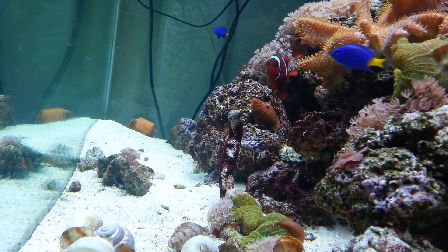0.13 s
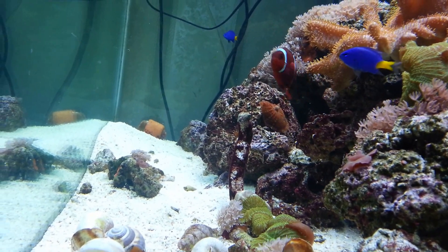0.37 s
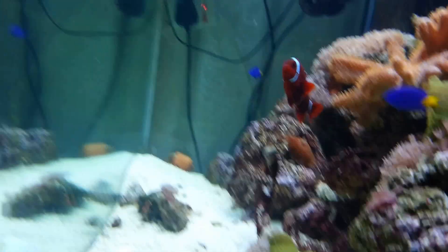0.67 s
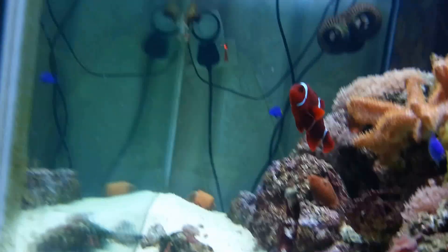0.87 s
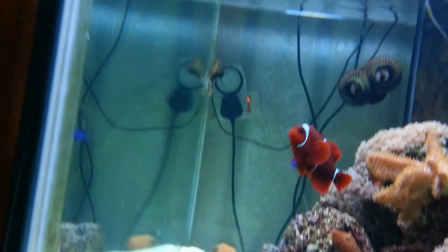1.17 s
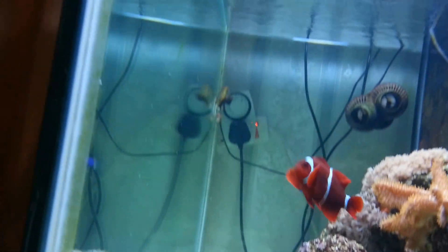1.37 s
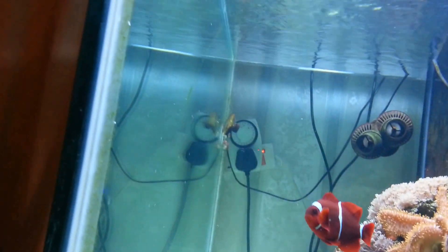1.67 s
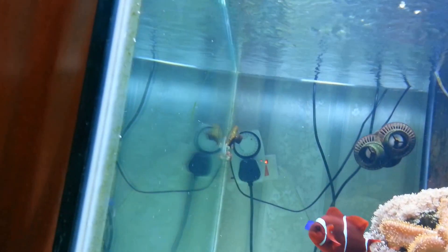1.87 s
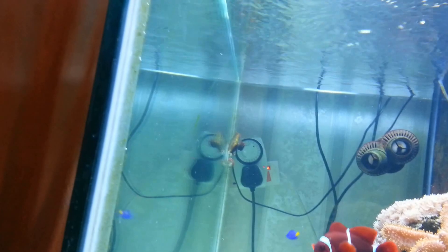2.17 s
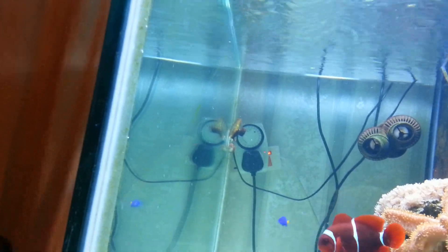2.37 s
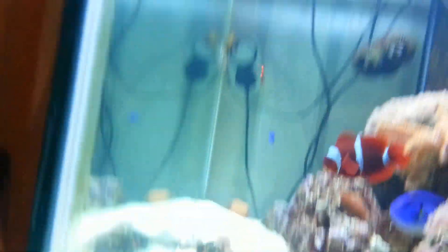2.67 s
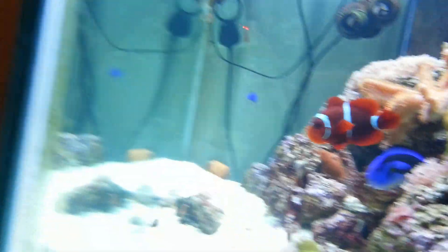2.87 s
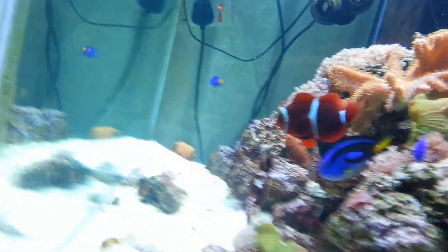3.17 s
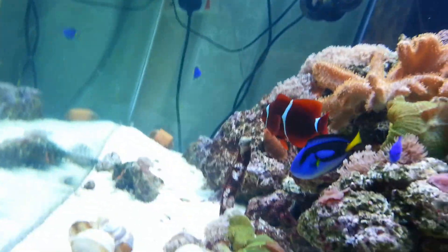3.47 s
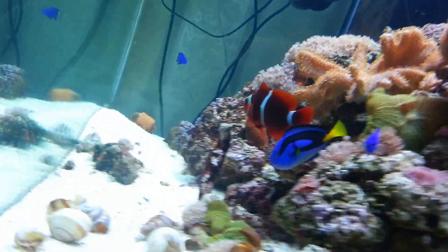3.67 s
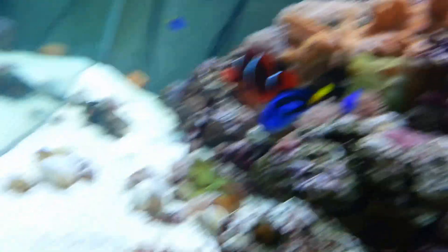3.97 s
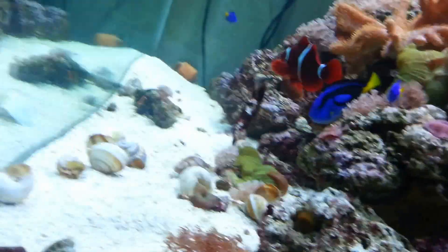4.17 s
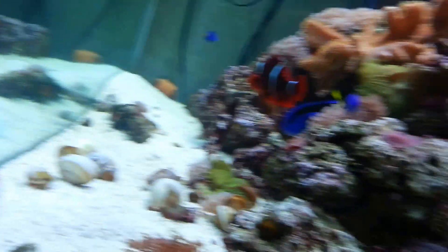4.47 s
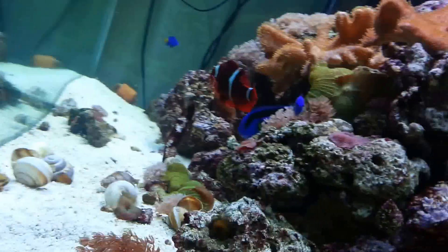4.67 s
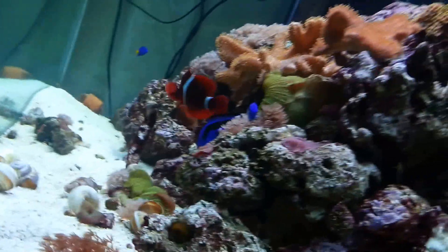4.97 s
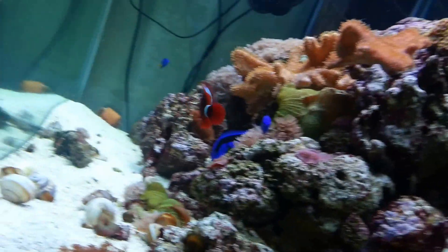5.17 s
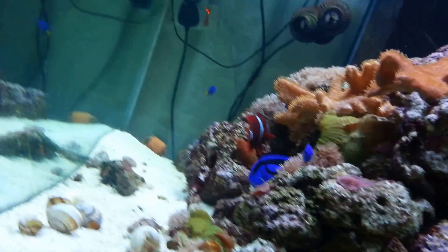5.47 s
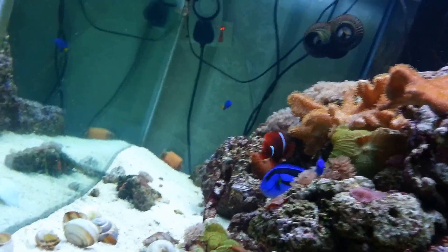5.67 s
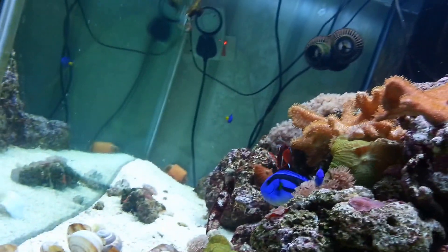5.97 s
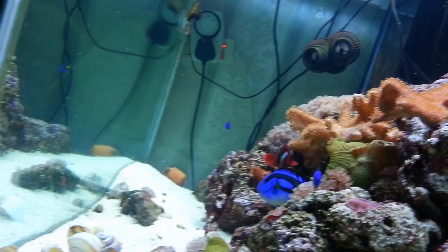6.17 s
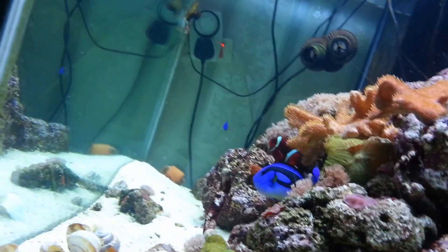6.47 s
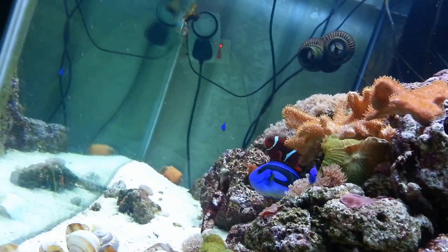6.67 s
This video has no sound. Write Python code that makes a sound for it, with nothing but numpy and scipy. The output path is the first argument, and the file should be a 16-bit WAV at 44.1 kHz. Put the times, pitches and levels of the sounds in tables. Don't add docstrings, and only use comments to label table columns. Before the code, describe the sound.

Steady low electrical hum and gentle surging water noise fill the whole scene. At first there is only a sharp tick and small scratchy rubs, then a violent crack of the camera casing, then a cluster of knocks and low thumps as a finger shifts over the right microphone. A thin whine joins midway, and a few tiny drips close it. Handheld, indoors, slight hiss.

```python
import sys
import numpy as np
from scipy import signal
from scipy.fft import rfft, irfft
from scipy.io import wavfile
from scipy.ndimage import uniform_filter1d

SR = 44100
rng = np.random.default_rng(int(sys.argv[2]) if len(sys.argv) > 2 else 0)


def persist_wave(psi):
    counts = np.round(np.clip(psi, -1, 1) * 32767).astype(np.int16)
    wavfile.write(sys.argv[1], SR, np.atleast_2d(counts).T)


def voltage_ratio(level):
    return 10 ** (np.asarray(level, float) / 20)


N = 300762
MAINS_HZ = 49.96


def at_hz(points, hz, column=1):
    points = np.array(points)
    return np.interp(np.log(hz + 1), np.log(points[:, 0]), points[:, column])


def drift(rate):
    r = np.exp(-80 * np.pi * rate / SR)
    slow = signal.lfilter([1], [1, -2 * r, r * r], rng.standard_normal(N // 40 + 2002))
    slow = slow[2000:]
    return np.interp(np.arange(N) / 40, np.arange(len(slow)), slow / slow.std())


def coloured(db_per_hz, turn=0):
    return voltage_ratio(db_per_hz) * np.sqrt(SR / 2) * np.exp(-1j * turn)


def band_pass(order, edges_hz, sound):
    return signal.sosfilt(signal.butter(order, edges_hz, "band", fs=SR, output="sos"), sound)


def add(track, s, sound):
    i = round(s * SR)
    track[i:i + len(sound)] += sound[:N - i]


def ring(hz, t60, rise=0.):
    t = np.arange(int(t60 * SR)) / SR
    return np.sin(2 * np.pi * hz * t) * voltage_ratio(-60 * t / t60) * (1 - np.exp(-t / (rise + 1e-6)))


def port_lag(hz):
    return 0.29 + 1.33 * np.tanh(hz / 400)


def hum(loss):
    # (multiple of mains, left level [dB], right minus left [dB], wobble [dB])
    orders = [(1, -58.5, 3.5, -4.2), (2, -44.5, -5, .5), (3, -50.5, -2.5, 2.5), (4, -65.5, -14, -4),
              (5, -67, -1.5, 4), (6, -57.5, -11.5, 2), (7, -72.5, -18, -0.5), (8, -76.5, -5, 4.5),
              (9, -63, -21, 6), (10, -67.5, -1, 7), (12, -64.5, -19, 1.5), (14, -62.5, -11.5, 2.5),
              (16, -73, -8, 9)]
    # (time [s], whine level [dB], 14th overtone gain [dB])
    turning = [
        (0, -96, -1.5),
        (2.6, -90, -.5),
        (3, -76, .1),
        (4.5, -75, 1.5),
        (6.82, -76, 1.8),
    ]
    t, out = np.arange(N) / SR, np.zeros((2, N))
    s, whine_db, turn_db = np.transpose(turning)
    for order, db, right_db, wobble_db in orders:
        phase = order * (2 * np.pi * MAINS_HZ * t - np.pi / 2)
        phase = phase - 0.3 * (order - 1) ** 2 + 0.14 * wobble_db * drift(3.5)
        level_db = db + wobble_db * np.tanh(drift(3.45))
        if order == 14:
            level_db = level_db + np.interp(t, s, turn_db)
        height = np.sqrt(2) * voltage_ratio(level_db)
        muffled = voltage_ratio(right_db) * loss ** (1.25 + 0.18 * order)
        out[0] += height * np.cos(phase)
        out[1] += height * muffled * np.cos(phase - port_lag(order * MAINS_HZ))
    whine_height = voltage_ratio(np.interp(t, s, whine_db) + 6 + 2.5 * drift(5))
    whine = whine_height * np.sin(2 * np.pi * 1120 * t + 0.8 * drift(5))
    return out + whine * voltage_ratio([[0], [-18]])


def rush(loss):
    # (pitch [Hz], level [dB per Hz])
    spectrum = [(30, -99), (42, -86), (70, -76.5), (125, -75.5), (230, -73), (290, -78.5), (480, -78.5),
                (680, -85), (870, -87), (1120, -93), (1600, -97.5), (3000, -106), (5000, -114),
                (9000, -120)]
    # (pitch [Hz], gain [dB], share common with the open port [0-1])
    muffle = [(60.3, 3, 0.7), (201, -6.5, 0.97), (306, -6.5, 0.86), (700, -15, 0.1), (1383, -10.5, .05),
              (5000, -8.5, 0)]
    # (pitch [Hz], width [Hz], gain [dB])
    cabinet = [
        (231.2, 7, 6.5),
        (489, 87, 1),
        (700, 30, -1.5),
        (810, 40, -0.5),
    ]
    hz, t = np.arange(N // 2 + 1) * SR / N, np.arange(N) / SR
    surge_db = 0.59 * drift(11) + 0.19 - 0.08 * t
    near, own = rfft(rng.standard_normal((2, N)) * voltage_ratio(surge_db))
    db = at_hz(spectrum, hz)
    for top_hz, width, top_db in cabinet:
        db = db + top_db / (1 + (2 * (hz - top_hz) / width) ** 2)
    share = np.clip(at_hz(muffle, hz, column=2), 0, 1)
    right = share * near + np.sqrt(1 - share ** 2) * own
    right = right * coloured(db + at_hz(muffle, hz), port_lag(hz))
    return irfft([near * coloured(db), right], N) * [np.ones(N), loss]


def thump(first_hz, last_hz, peak_ms):
    t = np.arange(int(0.08 * SR)) / SR
    sag, smother = 0.005, 1.6
    phase = 2 * np.pi * (last_hz * t + (first_hz - last_hz) * sag * (1 - np.exp(-t / sag)))
    u = t / peak_ms * 1000
    return -np.sin(phase) * u * np.exp((1 - u ** smother) / smother)


def finger(rumble_db):
    # (time [s], peak [dB], first pitch [Hz], last pitch [Hz], time to peak [ms])
    thumps = [(0.8416, -31.2, 109, 89, 8.7), (3.2387, -28.2, 171, 101, 3.5), (3.351, -28.1, 197, 61, 8.9),
              (3.6006, -15.5, 265, 91, 6.0), (3.7148, -14.8, 248, 96, 5.2), (4.1056, -14.4, 148, 92, 6.6),
              (4.3571, -20.4, 258, 75, 6.4), (4.5866, -33.1, 202, 96, 6.3), (4.877, -25.3, 217, 64, 8.1),
              (4.9106, -30.5, 102, 82, 7.7), (5.1317, -10.2, 291, 63, 6.1), (5.4153, -35, 172, 56, 13.6),
              (5.5092, -31.6, 288, 61, 16.0), (5.5547, -15.3, 252, 70, 9.5), (5.6021, -17.2, 234, 76, 9.9)]
    # (time [s], blow [dB], pitch [Hz])
    catches = [
        (3.5146, -32, 520),
        (3.6021, -12, 450),
        (4.104, -14, 250),
        (4.104, -23, 480),
        (4.3582, -22, 350),
        (5.7632, -34, 400),
    ]
    lumps = band_pass(3, [37, 150], rng.standard_normal(N) * voltage_ratio(2.0 * drift(15)))
    out = voltage_ratio(rumble_db) * lumps / lumps.std()
    for s, db, first_hz, last_hz, peak_ms in thumps:
        add(out, s, voltage_ratio(db) * thump(first_hz, last_hz, peak_ms))
        if first_hz > 200:
            edge_db = db + 2.5 - 1.18 * peak_ms
            edge = ring(1.5 * first_hz, 0.012, rise=0.0006)
            add(out, s + 0.269 * peak_ms * 0.0011, voltage_ratio(edge_db) * edge)
    for s, db, hz in catches:
        add(out, s, voltage_ratio(db) * ring(hz, 0.009, rise=0.0005))
    return band_pass(2, [24, 950], out)


def noise_swells():
    # (time [s], length [s], level [dB])
    dull_swells = [(0.34, 0.071, -73), (0.95, .045, -62), (2.338, .06, -68), (2.63, 0.053, -61.5),
                   (3.249, 0.061, -54), (3.31, 0.1, -62), (3.499, 0.066, -63.5), (3.591, 0.042, -59),
                   (3.696, 0.078, -63.5), (4.078, 0.098, -57), (4.151, 0.14, -64), (4.339, 0.068, -58.5),
                   (4.608, 0.025, -63), (4.833, 0.21, -68.5), (5.529, 0.074, -60), (5.583, 0.067, -63)]
    # (time [s], length [s], level [dB])
    bright_swells = [
        (0.948, 0.047, -59.5),
        (3.587, .06, -68),
        (4.757, 0.36, -75),
        (5.125, 0.053, -64),
    ]
    out = np.zeros(N)
    for bursts, hz in [(dull_swells, 2580), (bright_swells, 9400)]:
        for s, length, db in bursts:
            roughness = np.repeat(voltage_ratio(rng.normal(0, 2.1, 128)), 128)
            noise = band_pass(1, [hz / 1.94, hz * 1.05], rng.standard_normal(16384) * roughness)
            noise = noise[:int(length * SR)]
            swell = np.interp(np.linspace(0, 1, len(noise)), [0, 0.21, 1.2], [0, 1.3, 0])
            add(out, s, voltage_ratio(db) * noise / noise.std() * swell)
    return out


def ticks():
    # (time [s], peak [dB], casing pitch [Hz], port whistle minus peak [dB])
    hard = [
        (0.9275, -46, 3000, 6),
        (0.9507, -45, 3000, 13),
        (0.9586, -5.5, 1050, -8.5),
        (3.2585, -33, 2980, -12),
        (3.2742, -10, 1150, -6),
    ]
    # (time [s], peak [dB])
    creaks = [(.976, -38), (1.465, -42), (1.587, -44), (2.409, -36.5), (2.6395, -39), (2.66, -45),
              (4.358, -33)]
    # (time [s], peak [dB])
    taps = [
        (3.5145, -29),
        (4.3575, -25.5),
        (5.556, -29),
        (5.602, -34),
    ]
    out = np.zeros(N)
    faint = [(*row, 2380, -13) for row in creaks] + [(*row, 477, -25) for row in taps]
    for s, db, hz, port_db in [*hard, *faint]:
        add(out, s, -voltage_ratio(db + 4) * ring(hz, 2.9 / hz, rise=0.0001))
        add(out, s, voltage_ratio(db + port_db + 3.5) * ring(7500, 0.0024, rise=0.00015))
        add(out, s, voltage_ratio(db + port_db - 9) * ring(10900, 0.0012, rise=0.0001))
    out = signal.lfilter(*signal.iirnotch(5800, 5, fs=SR), out + 1e-18)
    return signal.sosfilt(signal.butter(2, 230, "high", fs=SR, output="sos"), out)


def drops():
    # (time [s], level [dB], pitch [Hz], length [s])
    plinks = [(2.328, -57.5, 1380, 0.035), (2.943, -72, 2900, 0.059), (3.513, -68, 5200, .006),
              (6.342, -76, 1880, 0.053), (6.396, -70, 2610, 0.022), (6.41, -70, 2050, 0.022),
              (6.462, -70, 1596, .03), (6.485, -73, 1560, .04), (6.515, -66, 1620, .04)]
    out = np.zeros(N)
    for s, db, first_hz, length in plinks:
        hz = np.linspace(first_hz, first_hz * 1.02, int(length * SR))
        waver = uniform_filter1d(rng.standard_normal(4096), size=64)[:len(hz)]
        hz = hz * (1 + 0.21 * waver)
        add(out, s, voltage_ratio(db + 9) * np.sin(2 * np.pi * np.cumsum(hz) / SR) * np.hanning(len(hz)))
    return out


def casing():
    # (time [s], push [dB], +1 inward or -1 outward, contact [ms])
    snap = [
        (3.2993, -10, 1, 1.8),
        (3.3007, 4, -1, .7),
        (3.3015, -5, -1, .6),
        (3.302, -9, 1, 2.6),
        (3.3045, -6, -1, .6),
    ]
    # (pitch [Hz], level [dB], time to die by 60 dB [s])
    modes = [(179, -16, 0.036), (800, -18, 0.025), (1158, -11, 0.015), (1560, -5, 0.0037),
             (2090, -14.5, 0.02), (2740, -18.5, 0.018), (3730, -16, 0.013), (3970, -16, .013),
             (4400, -21.5, 0.014), (5395, -22, 0.02), (7100, -41, .012), (11500, -42, 0.0065)]
    out = np.zeros(N)
    for s, db, side, contact_ms in snap:
        add(out, s, np.sign(side) * voltage_ratio(db) * np.hanning(int(contact_ms * SR / 1000)))
        strengths = rng.normal(0, 1.5, len(modes))
        for (hz, mode_db, t60), chance_db in zip(modes, strengths):
            blow = np.sign(side) * voltage_ratio(db + mode_db + chance_db)
            add(out, s, blow * ring(hz, t60, rise=0.0011))
    t = np.arange(int(0.03 * SR)) / SR
    rattle = band_pass(2, [300, 5500], rng.standard_normal(len(t)))
    add(out, snap[-2][0], voltage_ratio(-11.5 - 60 * t / 0.023) * rattle * np.minimum(t / 0.0021, 1))
    t = np.arange(SR // 4) / SR
    glow = band_pass(2, [7600, 10200], rng.standard_normal(len(t)))
    add(out, snap[-1][0], voltage_ratio(-61 - 60 * t / 0.6) * glow / glow.std())
    return signal.sosfilt(signal.butter(2, 110, "high", fs=SR, output="sos"), out)


def scene():
    # (time [s], extra gain [dB], rumble level [dB])
    grip = [(0, 1, -65), (.9, 1, -64), (1.3, -0.5, -66), (2.4, -1, -59), (2.6, -1, -52), (3, 0, -65),
            (3.5, 1.7, -53), (4.2, -2, -45.5), (4.7, -3.5, -47.5), (5.0, -2, -39.5), (5.2, -3, -56),
            (5.45, -4, -45.5), (5.9, -4.5, -49), (6.82, -5.5, -52)]
    s, loss_db, rumble_db = np.transpose(grip)
    t = np.arange(N) / SR
    loss = voltage_ratio(np.interp(t, s, loss_db))
    room = hum(loss) + rush(loss)
    hand = finger(np.interp(t, s, rumble_db)) * voltage_ratio([[-28], [0]])
    small = (noise_swells() + drops()) * voltage_ratio([[0], [-13]]) + ticks() * voltage_ratio([[0], [-36]])
    shell = casing()
    leak = signal.sosfilt(signal.butter(3, 1300, fs=SR, output="sos"), np.roll(shell, 30))
    return room + hand + small + [shell, voltage_ratio(-23) * leak]


def roll_off(x):
    return signal.sosfilt(signal.butter(12, 15260, fs=SR, output="sos"), x)


def record(dry):
    self_noise_db = [
        [-66],
        [-71],
    ]
    hiss = voltage_ratio(np.array(self_noise_db)) * rng.standard_normal((2, N))
    x = np.clip(dry + hiss, -1, 1)
    x = signal.sosfilt(signal.ellip(10, 0.5, 55, 14600, fs=SR, output="sos"), x)
    return roll_off(x)


dry = scene()
out = record(dry)
persist_wave(out)
```